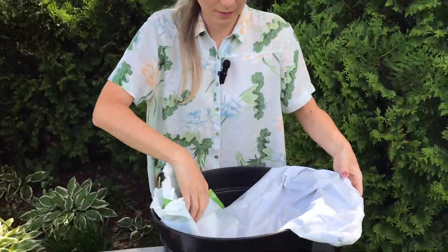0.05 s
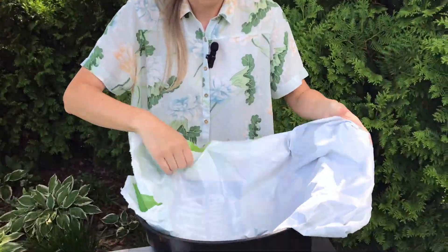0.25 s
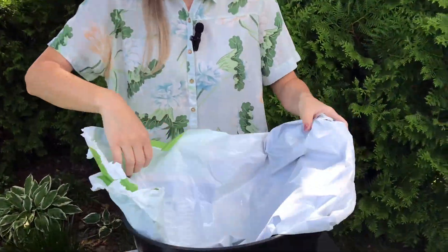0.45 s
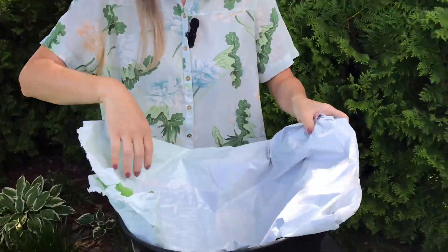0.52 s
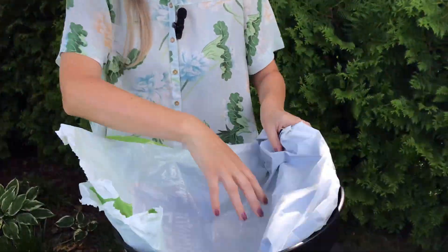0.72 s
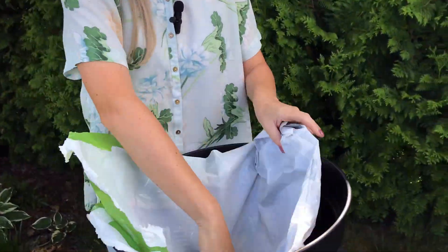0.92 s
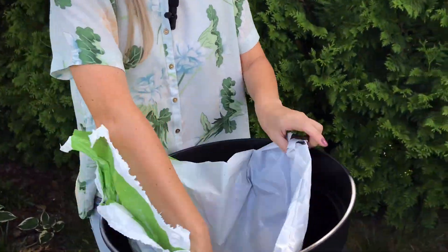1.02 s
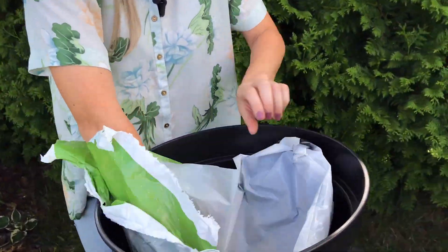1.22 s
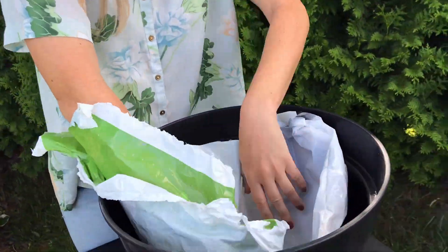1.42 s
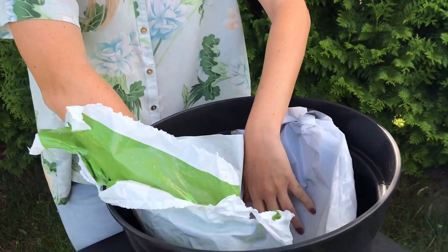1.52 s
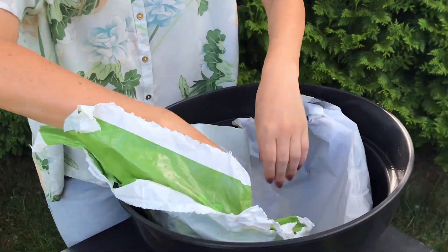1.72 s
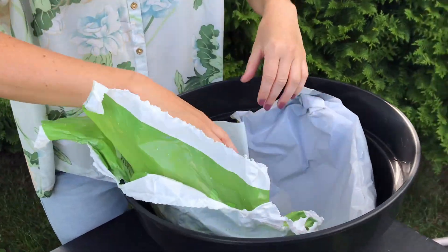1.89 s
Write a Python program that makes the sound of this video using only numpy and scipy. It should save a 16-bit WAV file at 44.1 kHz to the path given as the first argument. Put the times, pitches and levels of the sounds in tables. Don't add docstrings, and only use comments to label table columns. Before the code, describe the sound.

Crinkly plastic film crackles in bursts while being pushed and smoothed inside a big pot outdoors

```python
import sys
import numpy as np
from scipy import signal
from scipy.io import wavfile
from scipy.ndimage import uniform_filter1d

SR = 44100
rng = np.random.default_rng(int(sys.argv[2]) if len(sys.argv) > 2 else 0)


def attenuation_scalar(level_db):
    decades = np.asarray(level_db, float) / 20
    return 10 ** decades


def unload_audio(sound):
    columns = np.transpose(np.atleast_2d(sound))
    steps = np.round(np.clip(columns, -1, 1) * 32767)
    wavfile.write(sys.argv[1], SR, steps.astype(np.int16))


N = 85995


def evened(x):
    return x / np.sqrt(np.mean(x ** 2) + 1e-20)


def curve(points):
    return np.interp(np.arange(N) / SR, *np.transpose(points))


def add(mix, s, sound):
    part = mix[round(s * SR):][:len(sound)]
    part += sound[:len(part)]


def resonate(x, hz, width):
    turn = np.exp(2j * np.pi * np.cumsum(hz * np.ones(len(x))) / SR)
    r = np.exp(-np.pi * width / SR)
    return 2 * (turn * signal.lfilter([1 - r], [1, -r], x / turn)).real


def resonate_twice(x, hz, width, second_width):
    return resonate(resonate(x, hz, width), hz, second_width)


def colour(x, points, below_db):
    f, db = np.transpose(points)
    hz = np.abs(np.fft.fftfreq(4096, 1 / SR)) + 1
    shape_db = np.interp(np.log(hz), np.log(f), db)
    shape_db = shape_db + below_db * np.maximum(np.log2(f[0] / hz), 0)
    log = np.log(attenuation_scalar(shape_db) + 1e-5)
    taps = np.fft.ifft(np.exp(log - 1j * signal.hilbert(log).imag)).real[:2048]
    return signal.oaconvolve(x, taps)[:len(x)]


def grains(per_s, size_db):
    size = attenuation_scalar(size_db * np.minimum(rng.exponential(1, N), 4.2))
    size = size * (rng.random(N) < per_s / SR) * rng.choice([-1., 1.], N)
    kind, out = rng.integers(0, 24, N), np.zeros(N)
    for k, hz in enumerate(np.geomspace(500, 16000, 24)):
        turns = np.arange(400) * hz / SR
        buckle = np.sin(2 * np.pi * turns) * np.exp(-turns / 2.2) * (1 - np.exp(-turns))
        buckle = buckle / np.linalg.norm(buckle) * np.sqrt(hz)
        out += signal.oaconvolve(size * (kind == k), buckle)[:N]
    return evened(out)


def blips(rows, spread_s):
    out, t = np.zeros(N), np.arange(-1200, 2400) / SR
    shape = np.exp(-(t / np.where(t < 0, 0.9 * spread_s, 1.15 * spread_s)) ** 2)
    for (s, db, hz), (a, b, c, apart) in zip(rows, rng.random((len(rows), 4))):
        low, high = hz * (.9 - .08 * apart), hz * (1.18 - .08 * apart)
        sides = np.sin(2 * np.pi * (low * t + b)) + np.sin(2 * np.pi * (high * t + c))
        tone = np.sin(2 * np.pi * (hz * t + a)) + .4 * sides
        add(out, s + t[0], attenuation_scalar(db) * shape * tone)
    return out


# (time [s], pressure [dB], hollow share [dB], deep share [dB], slide hiss [dB])
HAND = [(.05, -100, 3, -14, -26), (.09, -58, -23, -11, -15), (0.152, -41, -13.5, -4.5, -15),
        (.28, -50.5, -12, -5, -5), (.41, -52.5, -5.5, -7.5, -17.5), (.5, -47, -13.5, -12.5, -15),
        (.58, -51, -13, -6.5, -13.5), (.825, -51, -13.5, -10.5, -27), (1.0, -43.5, -5, -6.5, -20),
        (1.14, -48, -5, -19, -18), (1.291, -49, -9.5, -17, -24), (1.442, -50.5, -3.5, -23.5, -23),
        (1.503, -58.5, -11.5, -12.5, -10.5), (1.578, -53.5, -6.5, -26.5, -16), (1.67, -47, 0, -5, -11),
        (1.74, -70, 2, -22.5, -6.5), (1.81, -89, 0, -8, 4), (1.869, -105, -4.5, -11.5, 7)]


def hand(column):
    rows = np.array(HAND)
    return curve(rows[:, [0, column]])


# (pitch [Hz], level per Hz [dB])
AIR = [(30, -5), (90, -4), (200, -7), (850, -9), (1300, -12.5), (14000, -19), (15000, -47)]


def garden_air():
    return attenuation_scalar(-85.5) * evened(colour(rng.standard_normal(N), AIR, -15))


def handling():
    low = evened(resonate_twice(rng.standard_normal(N), 95, 95, 160))
    reach_db = curve([(.16, -14), (.21, 4), (.3, -6.5), (1.08, -11.5), (1.15, -17.5)])
    return low * attenuation_scalar(hand(1) + hand(3) - 9.5 + reach_db)


def pot_tail(x):
    t = np.arange(6000) / SR
    echoes = rng.standard_normal(len(t)) * (rng.random(len(t)) < .1)
    tail = echoes * attenuation_scalar(-60 * t / .035) * (t > .0015)
    return signal.oaconvolve(x, tail / np.linalg.norm(tail))[:N]


# (time [s], peak level [dB])
SPITS = [
    (0.726, -46),
    (.766, -63),
    (1.38, -32.5),
    (1.419, -40),
    (1.454, -40),
    (1.53, -46),
]


def slide(level):
    hiss = rng.standard_normal(N) + .25 * grains(4200, 2.0)
    hiss = evened(resonate_twice(hiss, 14100, 5800, 5800))
    flare = curve([(1.34, 0.74), (1.37, 1.0), (1.57, 0.89), (1.62, 0.43)])
    spit, t = np.zeros(N), np.arange(2000) / SR
    for s, db in SPITS:
        add(spit, s, attenuation_scalar(db) * np.exp(-t / 0.0028))
    burst = level / attenuation_scalar(hand(1))
    return hiss * (spit + attenuation_scalar(hand(1) + hand(4) - 1) * burst ** flare)


# (time [s], pitch [Hz])
HOLLOW_HZ = [(.8, 580), (1.0, 650), (1.299, 700), (1.7, 626)]
# (time [s], peak level [dB], pitch [Hz])
FLAPS = [(0.131, -43, 490), (0.138, -54, 1120), (0.144, -61, 534), (0.145, -56, 303), (0.145, -47, 740),
         (0.162, -52, 390), (0.176, -40, 415), (0.18, -39, 650), (0.182, -39, 1168), (0.198, -51, 430),
         (0.252, -44, 746), (0.254, -38, 515), (0.321, -40, 343), (0.438, -46.5, 410), (0.507, -46, 368),
         (0.527, -46, 456), (0.858, -45, 444), (0.968, -36, 700), (0.97, -34.5, 544), (0.987, -41, 470),
         (0.99, -38.5, 990), (0.991, -41, 292), (1.0, -38.5, 730), (1.021, -34.5, 648), (1.022, -51, 303),
         (1.055, -46, 690), (1.071, -43, 435), (1.073, -41, 934), (1.075, -49, 647), (1.101, -44.5, 500),
         (1.245, -48, 680), (1.284, -42, 760), (1.3, -36.5, 745), (1.376, -43, 710), (1.391, -42, 704),
         (1.422, -41, 727), (1.457, -48, 560), (1.458, -49.5, 747), (1.593, -51.5, 670), (1.649, -47, 1000),
         (1.656, -39, 624), (1.699, -49, 596), (1.718, -55.5, 640), (1.732, -64, 635)]
# (time [s], peak level [dB], pitch [Hz])
RING_OUT = [
    (1.752, -60.5, 660),
    (1.766, -66.5, 646),
    (1.786, -74, 643),
]


def hollow(level):
    burst = level / attenuation_scalar(hand(1))
    tone = resonate_twice(grains(900, 2.0), curve(HOLLOW_HZ), 276, 552)
    under = resonate_twice(grains(900, 2.2), 410, 140, 290)
    deep = resonate_twice(rng.standard_normal(N), 269.4, 145, 290)
    boom = evened(evened(tone) + attenuation_scalar(-8.5) * evened(under))
    out = boom * attenuation_scalar(hand(1) + hand(2) - 1.5) * burst ** 1.12
    out += evened(deep) * attenuation_scalar(hand(1) + hand(3) - 5.5) * uniform_filter1d(burst, 600) ** 0.85
    out = signal.sosfilt(signal.butter(6, 830, fs=SR, output="sos"), out)
    return out + attenuation_scalar(0.5) * blips(FLAPS + RING_OUT, 0.0067)


def patchy(x):
    z = signal.stft(x, nperseg=256)[2]
    field = uniform_filter1d(rng.standard_normal(z.shape), size=6, axis=0)
    field = evened(uniform_filter1d(field, size=8, axis=1))
    return evened(signal.istft(z * attenuation_scalar(1.5 * field), nperseg=256)[1][:N])


# (time [s], peak level [dB], pitch [Hz], swarm length [s])
SNAPS = [(0.0852, -51, 2800, 0.0023), (0.1271, -30, 2300, 0.0066), (0.1512, -36, 3400, 0.0018),
         (0.187, -31.5, 2120, 0.007), (0.3375, -29.5, 2100, 0.02), (0.3732, -32.5, 4630, 0.0046),
         (0.4895, -27, 3950, 0.0067), (0.5102, -29, 2160, 0.011), (0.5289, -28.5, 3930, 0.011),
         (0.6405, -34, 1940, 0.0024), (0.7241, -24.5, 3840, 0.0046), (0.7651, -35.5, 2660, 0.0043),
         (0.8002, -33, 4660, 0.0013), (1.066, -23, 2380, 0.006), (1.0705, -38, 2680, 0.0037),
         (1.1579, -27, 3120, 0.0028), (1.182, -24, 3820, 0.0048), (1.1987, -29, 6430, 0.0057),
         (1.2429, -25.5, 4900, 0.00086), (1.2724, -26.5, 2340, 0.0054), (1.3164, -30.5, 3300, 0.0057),
         (1.3329, -27.5, 3600, 0.0017), (1.3648, -24, 5070, 0.00083), (1.3778, -24, 6500, 0.002),
         (1.4089, -27, 3200, 0.0036), (1.4179, -28, 3200, 0.0051), (1.4392, -33, 2260, 0.0021),
         (1.4539, -25, 3130, 0.0062)]
# (time [s], peak level [dB], pitch [Hz], swarm length [s])
LAST = [
    (1.529, -26.5, 2940, 0.0046),
]
# (time [s], peak level [dB], pitch [Hz], swarm length [s])
FOLDS = [(0.1191, -28.5, 2450, 0.0081), (0.1425, -26, 2610, 0.013), (0.1679, -21.5, 3460, 0.03),
         (0.2007, -29, 2540, 0.011), (0.2219, -29.5, 5000, 0.01), (0.2435, -29.5, 5230, 0.0051),
         (0.253, -27, 4230, 0.011), (0.324, -26.5, 4800, 0.0065), (0.4382, -29.5, 2420, 0.013),
         (0.4637, -27, 4000, 0.0072), (0.4801, -23.5, 3760, 0.011), (0.6140, -28.5, 2170, 0.002),
         (0.619, -31.5, 4500, 0.0039), (0.6563, -26, 2450, 0.0073), (0.8588, -27, 2600, 0.0094),
         (0.8665, -19.5, 2410, 0.011), (0.9009, -25, 4870, 0.0052), (0.9498, -36.5, 2220, 0.0035),
         (0.9691, -26, 3520, 0.014), (0.9955, -19, 6650, 0.0037), (1.0175, -22.5, 4040, 0.015),
         (1.0551, -16.5, 4670, 0.007), (1.0991, -29, 4440, 0.0091), (1.1759, -27, 2570, 0.0023),
         (1.2211, -29.5, 2300, 0.011), (1.258, -25.5, 4570, 0.019), (1.2901, -21.5, 5500, 0.0028),
         (1.298, -24.5, 3800, 0.015)]
# (time [s], peak level [dB], pitch [Hz], swarm length [s])
PATS = [
    (1.3722, -23.5, 5670, 0.0035),
    (1.3894, -23, 3800, 0.0071),
    (1.5574, -24.5, 6100, 0.0055),
    (1.577, -31, 2560, 0.014),
    (1.6346, -31, 3700, 0.0063),
    (1.649, -25.5, 3900, 0.01),
    (1.672, -28.5, 3900, 0.006),
]


def creases(raw):
    rings, ticks, swarm = np.zeros((3, N))
    t = np.arange(4500) / SR
    lead_s, ring_cycles = .04, 2.63
    late = t - lead_s
    # (creases, ring [dB], swarm [dB], rise time as a share of the fall time)
    kinds = (SNAPS + LAST, -1, -7, .22), (FOLDS + PATS, -8, -12.5, 0.98)
    for rows, ring_db, swarm_db, rise in kinds:
        for s, db, hz, spread in rows:
            u = t * hz / ring_cycles
            start = s - ring_cycles / hz / 2
            add(rings, start, attenuation_scalar(db + ring_db) * np.sin(2 * np.pi * hz * t) * 2 * u * np.exp(1 - 2 * u))
            add(ticks, start, attenuation_scalar(db + ring_db + 2.5) * np.exp(-t / .0004) * rng.standard_normal(len(t)))
            swell = np.exp(np.where(late > 0, -late, late / rise) / max(spread, .001))
            shape = attenuation_scalar(db + swarm_db) * swell
            part = raw[round(s * SR):][:len(t)]
            tint = evened(resonate_twice(part, hz, 0.64 * hz, 1.28 * hz))
            add(swarm, s - lead_s, shape)
            add(rings, s - lead_s, attenuation_scalar(-5) * shape * tint)
    return rings, ticks, swarm


# (pitch [Hz], level
# per Hz [dB])
HEARD_COLOUR = [(530, -20), (900, -8), (1330, -4.5), (2260, -3), (6740, -7.5), (8700, -15), (9500, -26.5),
                (14600, -17.5), (16300, -35.5)]
# (pitch [Hz], width [Hz], level [dB])
WALL = [(1595, 100, -2), (2300, 118, 9), (3400, 250, -16.5), (4250, 400, 8), (6700, 1300, -15.5)]
# (time [s], share [0 to 1])
DEPTH = [(0.899, 0.35), (1.65, 0.46), (1.73, 0.6)]
# (time [s], peak level [dB], pitch [Hz])
PINGS = [(.065, -69, 2387), (.088, -54, 5330), (.135, -39, 2600), (.140, -31.5, 4280), (.152, -34, 4600),
         (.152, -37, 5730), (.161, -34, 2530), (.179, -38, 2620), (.302, -37, 5870), (.313, -39, 7000),
         (.362, -46, 4943), (.457, -34, 2360), (.481, -49, 5340), (.486, -33, 2530), (.545, -48, 3900),
         (.633, -44, 4600), (.666, -38, 2280), (.757, -41, 1430), (.859, -34, 5230), (.867, -38, 5400),
         (.936, -39, 2460), (.986, -31, 2230), (.994, -35, 3380), (.995, -31.5, 4400), (1.018, -32, 1580),
         (1.050, -39, 6500), (1.067, -32.5, 5050), (1.158, -31.5, 3010), (1.182, -27.5, 3760),
         (1.243, -36.5, 6780), (1.273, -29.5, 2890), (1.351, -40, 2650), (1.455, -31, 3900),
         (1.540, -41.5, 2430), (1.648, -39, 4800), (1.648, -37, 2170), (1.660, -39, 2950),
         (1.708, -52, 3230), (1.746, -61, 2300), (1.746, -53, 3400), (1.746, -62, 5970), (1.762, -65, 2300),
         (1.762, -58.5, 3960)]


def film():
    raw = patchy(grains(5500, 3.6) + .45 * rng.standard_normal(N))
    rings, ticks, swarm = creases(raw[::-1])
    scale = np.sqrt(np.mean(colour(raw, HEARD_COLOUR, 5.04) ** 2))
    level = np.hypot(attenuation_scalar(hand(1) + 4), swarm)
    drive = colour(raw * level + ticks, HEARD_COLOUR, -8.5) / scale
    wall = np.zeros(N)
    for k, (hz, width, db) in enumerate(WALL):
        wall += (-1) ** k * attenuation_scalar(db) * resonate_twice(drive, hz, width, 2 * width)
    share = np.clip(curve(DEPTH), 0, 1)
    crackle = (1 - share) * drive + share * attenuation_scalar(2.5) * wall
    return rings + attenuation_scalar(0.5) * blips(PINGS, 0.002) + crackle, level


def scene():
    sheet, level = film()
    near = sheet + hollow(level) + slide(level)
    near = near + attenuation_scalar(-13) * pot_tail(near)
    near = signal.sosfilt(signal.butter(6, 200, "high", fs=SR, output="sos"), near)
    return (near + handling() + garden_air())[None]


def roll_off(x):
    return signal.sosfilt(signal.butter(12, 16480, fs=SR, output="sos"), x)


def record(dry):
    edge = signal.firwin(401, 15850, window=("kaiser", 9), fs=SR)
    mix = signal.oaconvolve(dry, edge[None], "same") - 1e-4
    return roll_off(mix)


dry = scene()
out = record(dry)
unload_audio(out)
```